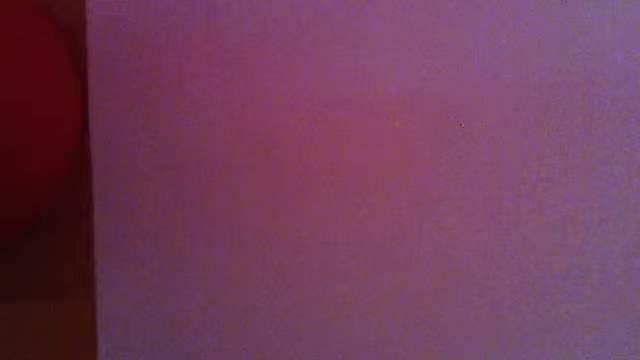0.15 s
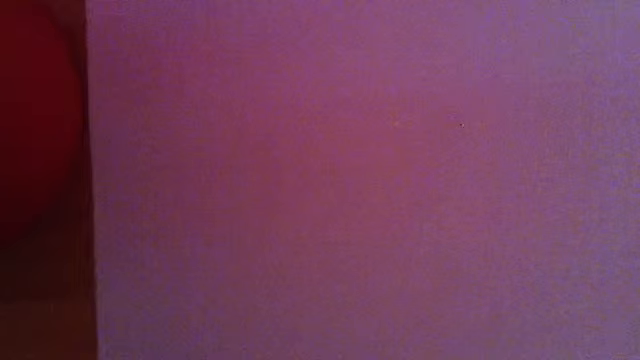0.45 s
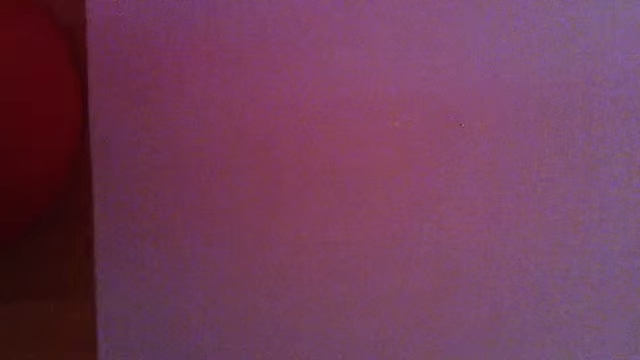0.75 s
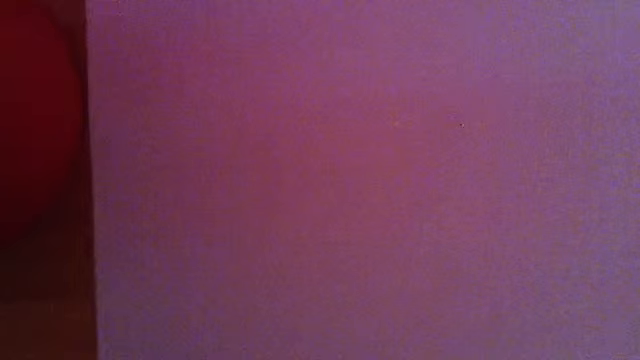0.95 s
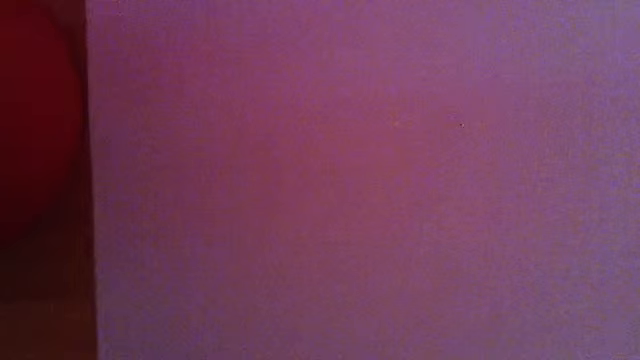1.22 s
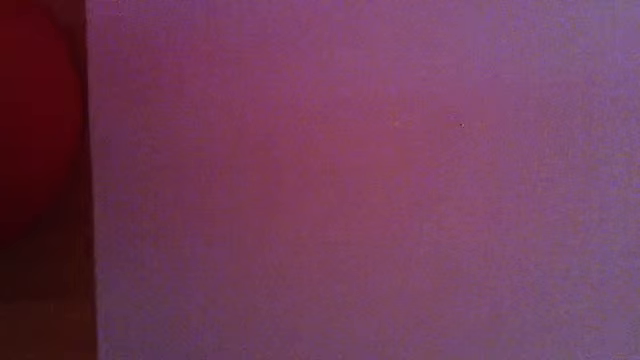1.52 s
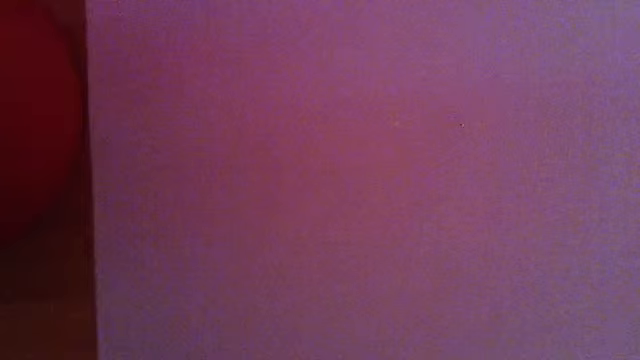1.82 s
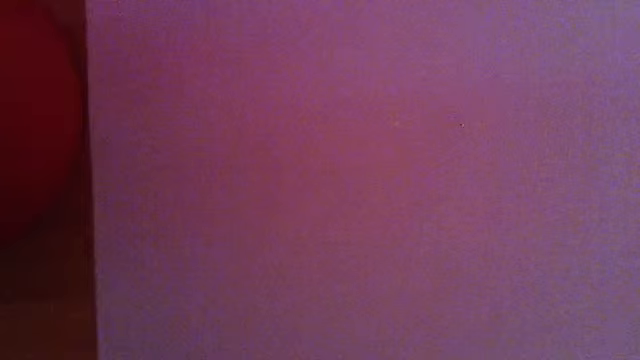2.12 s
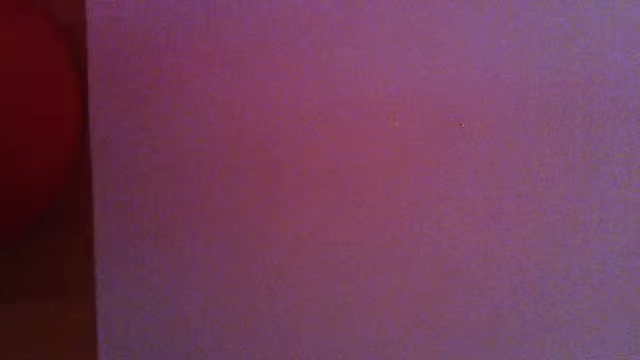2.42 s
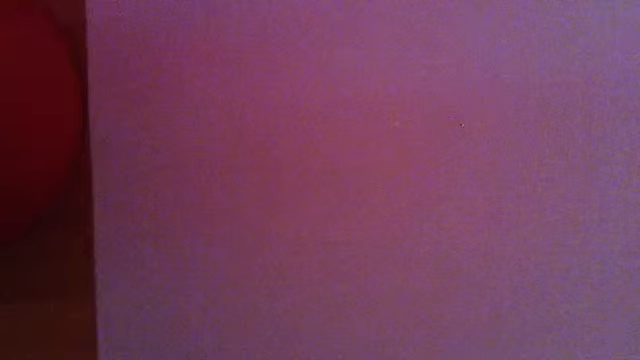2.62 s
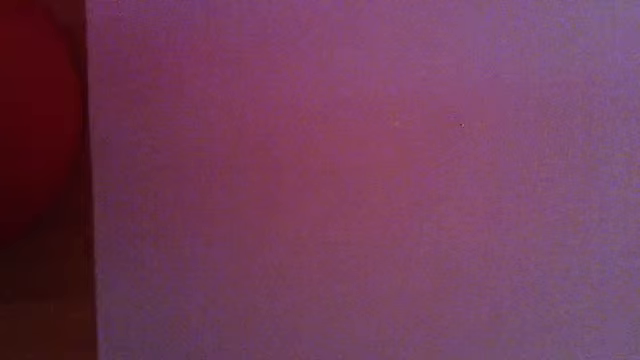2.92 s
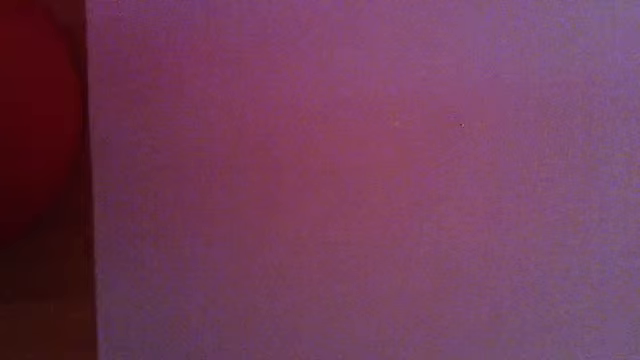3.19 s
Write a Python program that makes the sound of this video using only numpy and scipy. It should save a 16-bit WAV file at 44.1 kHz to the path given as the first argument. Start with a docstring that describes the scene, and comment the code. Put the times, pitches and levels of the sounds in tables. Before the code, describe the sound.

A pencil writes on paper up close, quiet scratches interrupted by sudden loud static glitches.

```python
"""A quiet room, close to a sheet of paper: a pencil writes, from light glides to harder, chattering scratches.
Bursts of paper-fibre snaps and smooth rub noise are shaped stroke by stroke and ring in pencil and sheet.
A soft low rustle dies away at the start, over filtered noise for the wavering room rumble and faint hiss.
Six times the recorder glitches into loud static, buffers of random samples: five short ticks, one longer rasp."""
import sys
import numpy as np
from scipy import signal
from scipy.fft import rfft, irfft
from scipy.io import wavfile
from scipy.ndimage import uniform_filter1d

SR = 44100
rng = np.random.default_rng(int(sys.argv[2]) if len(sys.argv) > 2 else 0)


def waveform_to_disk(signal):
    """Save audio, clipped to [-1, 1], as 16-bit WAV at the path in sys.argv[1]."""
    frames = np.transpose(np.atleast_2d(signal))
    scaled = np.clip(frames, -1, 1) * 32767
    samples = np.round(scaled).astype(np.int16)
    wavfile.write(sys.argv[1], SR, samples)


N = 147735  # length in samples


def amp(db):
    """Turns decibels into gain."""
    return 10 ** (np.asarray(db) / 20)


def unit(x):
    """Scales a signal to rms 1."""
    return x / np.sqrt(np.mean(x ** 2) + 1e-20)


def add(mix, start_s, sound):
    """Mixes a sound in at its start time, cut off at the end of the mix."""
    part = mix[max(round(start_s * SR), 0):][:len(sound)]
    part += sound[:len(part)]


def coloured(x, colour):
    """Filters x by a curve of (pitch_hz, level_db) points, joined along log frequency, to rms 1."""
    pitch_hz, level_db = np.transpose(colour)
    bins_hz = np.fft.rfftfreq(N, 1 / SR)
    gain = amp(np.interp(np.log(bins_hz + 1), np.log(pitch_hz), level_db))
    return unit(irfft(rfft(x) * gain, N))


def wobble(rate_hz):
    """Random motion at rms 1: noise whose spectrum falls away steeply above the rate."""
    ratio = np.fft.rfftfreq(N, 1 / SR) / rate_hz
    shape = ratio ** .5 * np.exp(-ratio ** 2)
    return unit(irfft(rfft(rng.standard_normal(N)) * shape, N))


# Colour of pencil and sheet under a light tip: pitch_hz [Hz], level_db [dB per Hz, relative]
LIGHT_TIP_COLOUR = [(300, -36), (600, -9.5), (950, -11.5), (1200, -4), (1430, -11), (1700, -4),
                    (2250, -16.5), (2700, -6), (3050, -18), (3350, -6), (3650, -15.5), (4000, -9.5),
                    (4500, -4), (5050, -1), (5800, -4), (6450, -3.5), (7000, -8), (7450, -13), (8050, -7.5),
                    (8600, 0.5), (9200, -7), (9550, -13), (11000, -12), (11800, -11.5), (12800, -9),
                    (14200, -15), (15800, -25)]
# Colour of pencil and sheet under a pressed tip: pitch_hz [Hz], level_db [dB per Hz, relative]
PRESSED_TIP_COLOUR = [(300, -40.5), (600, -18.5), (950, -23.5), (1200, -15.5), (1720, -5.5), (2200, -15.5),
                      (2700, -18.5), (3130, -8.5), (3670, -8.5), (4400, 1.5), (5580, -7.5), (6450, -8),
                      (7240, -15), (8100, -7), (8600, -2.5), (9200, -6.5), (9950, -13.5), (10800, -13),
                      (11650, -4), (12700, -11.5), (14300, -21.5), (15800, -27.5)]
FIBRES_PER_S, FIBRE_SPREAD_DB = 5000, 2  # snapping paper fibres
RUB_DB = 6  # smooth rub, relative to the snaps


def friction_colours():
    """The tip snaps scattered fibres over a smooth rub; one friction noise rings in two colours."""
    snaps = rng.random(N) < FIBRES_PER_S / SR
    strength = amp(FIBRE_SPREAD_DB * np.minimum(rng.exponential(1, N), 4))
    fibres = rng.standard_normal(N) * strength * snaps
    friction = unit(fibres) + amp(RUB_DB) * rng.standard_normal(N)
    return coloured(friction, LIGHT_TIP_COLOUR), coloured(friction, PRESSED_TIP_COLOUR)


# Pencil strokes: start_s [s], length_s [s], level_db [dB at the crest, before chatter],
# crest [share of the length, 0-1], pressure [0-1], chatter_db [dB rms, sign flips the motion]
PENCIL_STROKES = [ (0.000, 0.09, -55, 0, 0, 2.5), (0.062, 0.051, -49.5, .3, .3, 0.5),
                  (0.129, 0.075, -47, .5, 0.4, 1.5), (0.196, 0.12, -54, 0.1, 0, -1),
                  (0.396, 0.071, -48.5, .4, .3, 1.5), (0.453, 0.2, -55.5, 0.47, 0.2, 2.5),
                  (0.639, 0.14, -53.5, 0.3, 0.26, 1.5), (0.783, 0.32, -59, 0.1, 0, 5.5),
                  (0.936, .14, -48.5, 0.8, 0.55, 1.5), (1.067, 0.066, -54.5, 0.33, 0.1, 2),
                  (1.136, 0.059, -48, .35, 0.47, 1.5), (1.189, 0.14, -49, 0.34, 0.2, 0.5),
                  (1.334, 0.12, -42, 0.52, 0.6, 1), (1.433, 0.12, -45, .5, 1, 1.5),
                  (1.551, 0.1, -45.5, 0.56, 1, -1.5), (1.653, 0.27, -52.5, 0.5, 0.24, 0.5),
                  (1.871, .07, -51.5, 0.05, 0.97, -1.5), (1.959, 0.095, -46, .4, 0.6, 2.5),
                  (2.046, .036, -58.5, .3, .6, 0), (2.07, 0.1, -46.5, 0.24, 0.74, 2),
                  (2.162, 0.24, -52, 0.15, 0, -1.5), (2.473, 0.074, -48, 0, 0.16, 5),
                  (2.6, 0.085, -44.5, 0.3, 0.3, -0.5), (2.677, 0.16, -51.5, 0.52, 0.2, -0.5),
                  (2.817, 0.094, -47, 0.63, 0, -2.5), (2.978, 0.062, -44, 0.13, 0.78, -1.5),
                  (3.048, 0.3, -50, 0.35, 0.06, 0)]
EDGE_S = 0.0031  # the tip lands and lifts
RISE_DB, FALL_DB = 7.5, 8.5  # the hand speeds up to the crest and slows after it
CHATTER_HZ = 70  # how fast the tip catches and slips


def stroke_drags(t):
    """Each stroke swells to its crest and slows while the tip chatters; gives (power, pressure) pairs."""
    slip = wobble(CHATTER_HZ)
    drags = []
    for start_s, length_s, level_db, crest, pressure, chatter_db in PENCIL_STROKES:
        age = np.clip(t - start_s, 0, length_s)
        crest = np.clip(crest, .05, .95)
        past = age / length_s - crest  # negative before the crest
        rising_db = RISE_DB * (past / crest) ** 2
        falling_db = FALL_DB * (past / (1 - crest)) ** 2
        slow_db = np.where(past < 0, rising_db, falling_db)
        contact = np.clip(np.minimum(age, length_s - age) / EDGE_S, 0, 1)
        level = contact * amp(level_db - slow_db + chatter_db * slip)
        drags.append((level ** 2, pressure))
    return drags


# Short spurts of scratch: start_s [s], level_db [dB at the peak], pressure [0-1]
TIP_CATCHES = [(0.113, -46.5, 0.3), (.176, -43, 0.3), (.937, -50, 0.5), (0.961, -48.5, 0.4),
               (.984, -60, 0.4), (1.002, -46, 0.4), (1.354, -44, 1), (1.896, -43, 1), (1.973, -40.5, 0.9),
               (1.991, -40.5, 0.8), (2.001, -43, 0.7), (2.018, -42.5, 1), (2.143, -45.5, 0.4)]
CATCH_RISE_S = 0.0029  # from start to peak


def catch_drags(t):
    """The tip catches and lets go: a quick rise, then a decay; gives (power, pressure) pairs."""
    drags = []
    for start_s, level_db, pressure in TIP_CATCHES:
        u = np.clip((t - start_s) / CATCH_RISE_S, 0, 20)
        drags.append(((amp(level_db) * u * np.exp(1 - u)) ** 2, pressure))
    return drags


PLACE_DB, PLACE_WIDTH_HZ, PLACE_HOLD_S = 2.6, 500, .16  # rms depth and smoothing spans of the drift


def wandering(x):
    """The sheet's peaks and dips drift as the tip moves from place to place: smoothed random gains."""
    hz, t, spectrum = signal.stft(x, SR, nperseg=512)
    field = rng.standard_normal((len(t), len(hz)))
    field = uniform_filter1d(field, round(PLACE_HOLD_S / t[1]), axis=0)
    field = uniform_filter1d(field, round(PLACE_WIDTH_HZ / hz[1]), axis=1)
    moved = spectrum * amp(PLACE_DB * unit(field)).T
    return unit(signal.istft(moved, SR)[1][:N])


def pencil():
    """Strokes and catches add in power; their pressure blends the light and pressed friction colours."""
    light, pressed = friction_colours()
    t = np.arange(N) / SR
    drags = stroke_drags(t) + catch_drags(t)
    power = sum(p for p, _ in drags) + 1e-20
    weight = np.clip(sum(p * pressure for p, pressure in drags) / power, 0, 1)
    return np.sqrt(power) * wandering((1 - weight) * light + weight * pressed)


# Colour of the soft low rustle: pitch_hz [Hz], level_db [dB per Hz, relative]
RUSTLE_COLOUR = [(50, -12.5), (170, -5.5), (300, -0.5), (400, -5.5), (500, 0), (700, -8.5), (1000, -19.5),
                 (1680, -2.5), (2150, -22.5), (2550, -8), (3300, -19.5), (8000, -30.5)]
RUSTLE_DB, RUSTLE_HOLD_S, RUSTLE_FADE_DB_PER_S = -54, 0.14, 67.5


def rustle():
    """A dull rustle of filtered noise that holds briefly, then dies away at a steady rate in dB."""
    fade_db = RUSTLE_FADE_DB_PER_S * np.maximum(np.arange(N) / SR - RUSTLE_HOLD_S, 0)
    return amp(RUSTLE_DB - fade_db) * coloured(rng.standard_normal(N), RUSTLE_COLOUR)


# Colour of the room rumble: pitch_hz [Hz], level_db [dB per Hz, relative]
RUMBLE_COLOUR = [(20, -18.5), (55, -9.5), (95, 0), (180, -1.5), (300, -5), (420, -10.5), (900, -15.5),
                 (2500, -22.5), (8000, -40)]
# Colour of the faint hiss: pitch_hz [Hz], level_db [dB per Hz, relative]
HISS_COLOUR = [(100, 0), (2000, 0), (9000, -2), (15000, -7)]
ROOM_DB, HISS_DB = -61, -64.5
WAVER_DB, WAVER_HZ = 2.2, 7  # rms depth and rate of the rumble's level


def room():
    """Low room noise whose level wavers at random, under a faint steady hiss."""
    level = amp(ROOM_DB + WAVER_DB * wobble(WAVER_HZ))
    rumble = level * coloured(rng.standard_normal(N), RUMBLE_COLOUR)
    return rumble + amp(HISS_DB) * coloured(rng.standard_normal(N), HISS_COLOUR)


# Bursts of static: start_s [s], buffers [number of garbled buffers]
STATIC_BURSTS = [(.4539, 1), (.8255, 1), (1.3828, 1), (1.9400, 1), (2.3348, 7), (2.8688, 1)]
BUFFER_SAMPLES = 1024
STATIC_DB = -8  # rms, before the band limit


def static():
    """Whole buffers of evenly spread random samples: white noise that switches on and off at once."""
    out = np.zeros(N)
    for start_s, buffers in STATIC_BURSTS:
        noise = rng.uniform(-1, 1, buffers * BUFFER_SAMPLES)
        add(out, start_s, amp(STATIC_DB) * unit(noise))
    return out


def scene():
    """Pencil, rustle and room at one microphone, the same in both channels."""
    return np.tile(pencil() + rustle() + room(), (2, 1))


CUTOFF_HZ = 16000


def record(dry):
    """The recorder adds its bursts of static, then limits the band with a steep lowpass."""
    lowpass = signal.firwin(511, CUTOFF_HZ, window=("kaiser", 9), fs=SR)
    return signal.oaconvolve(dry + static(), lowpass[None], "same", axes=1)


dry = scene()
out = record(dry)
waveform_to_disk(out)
```